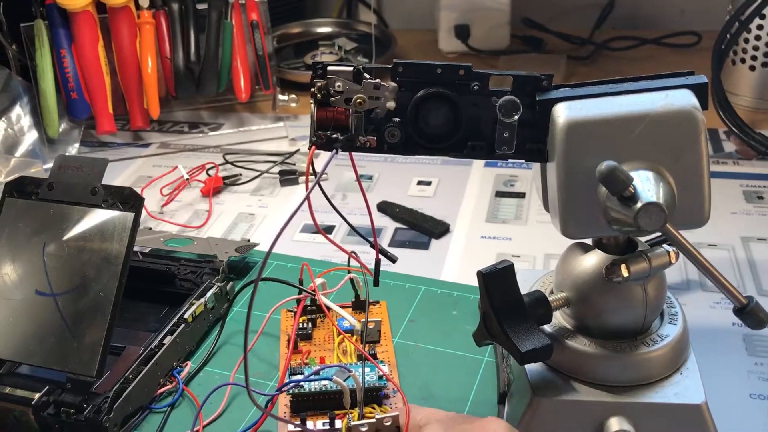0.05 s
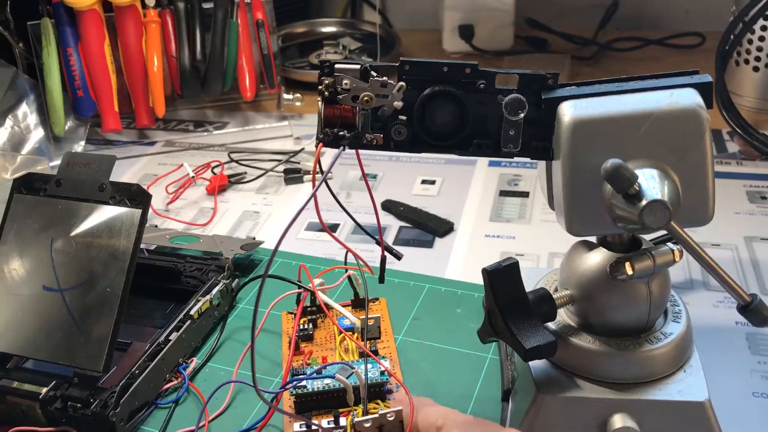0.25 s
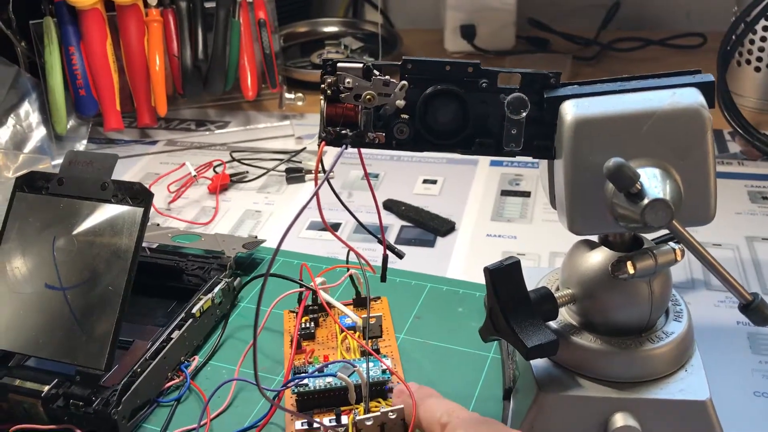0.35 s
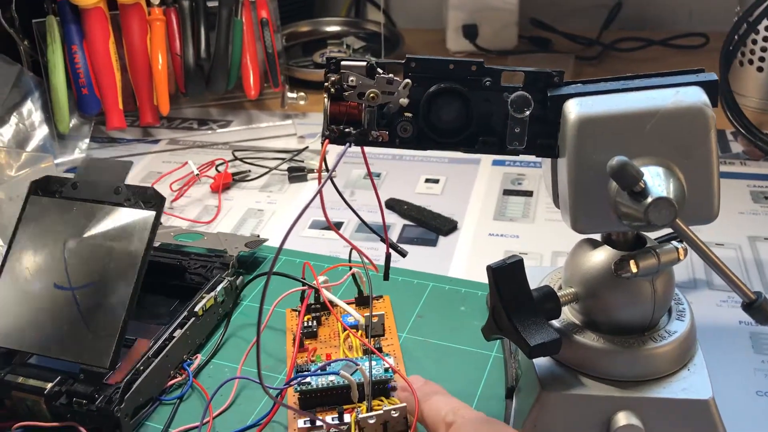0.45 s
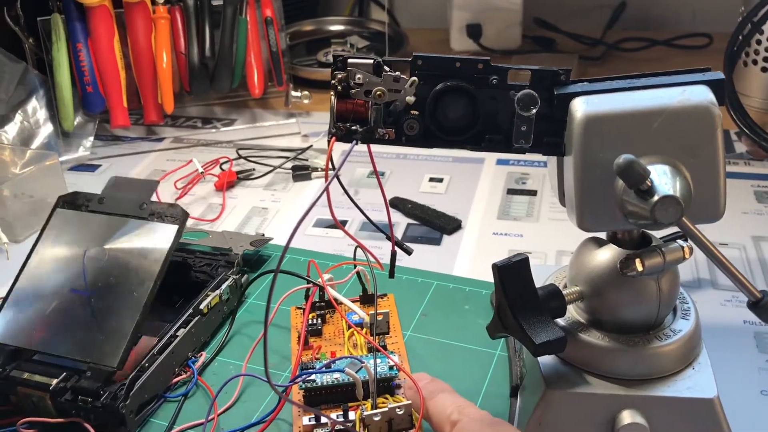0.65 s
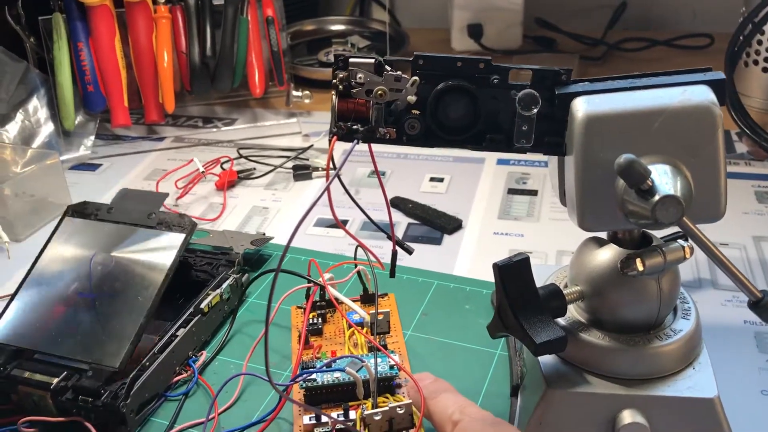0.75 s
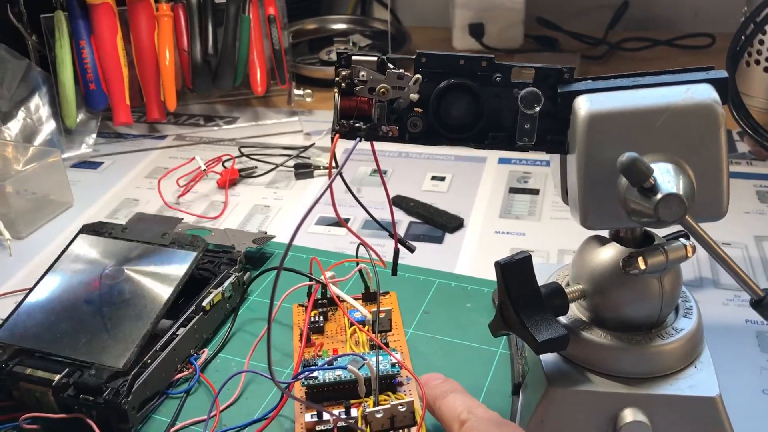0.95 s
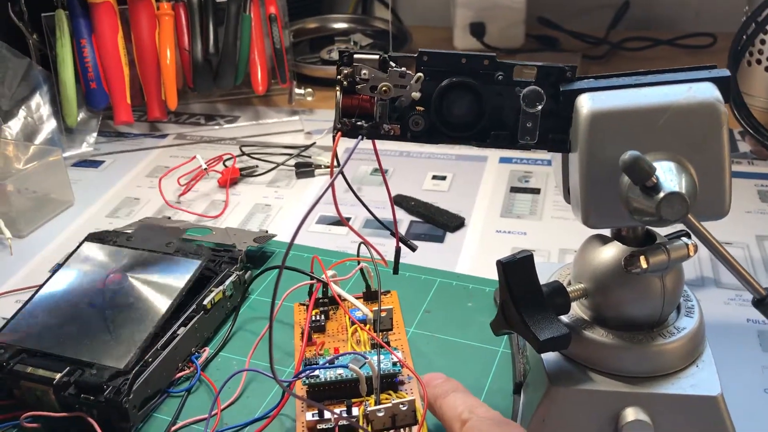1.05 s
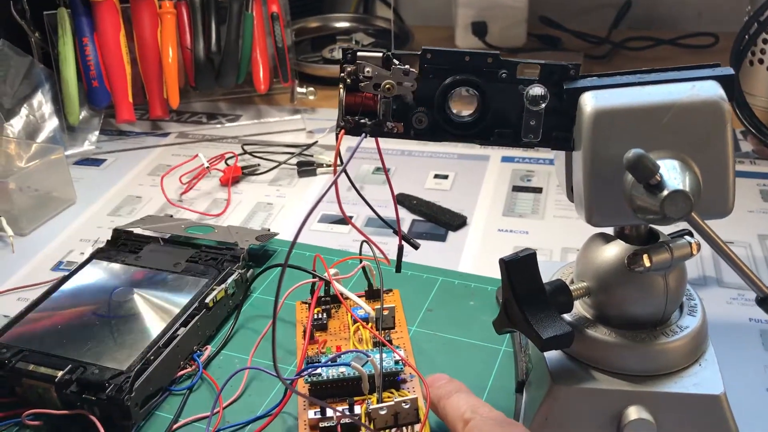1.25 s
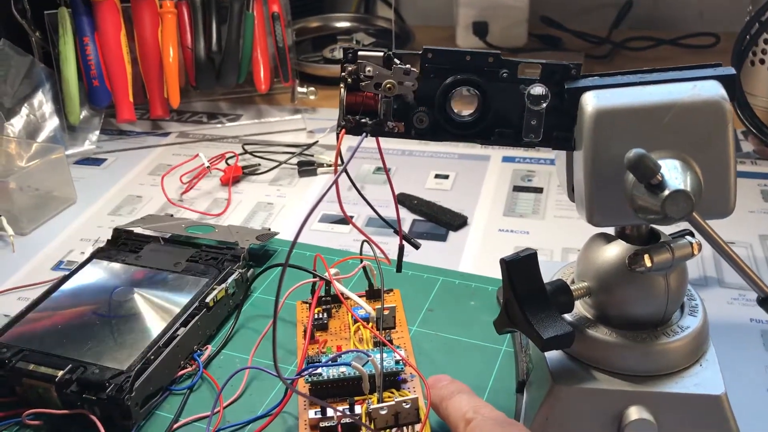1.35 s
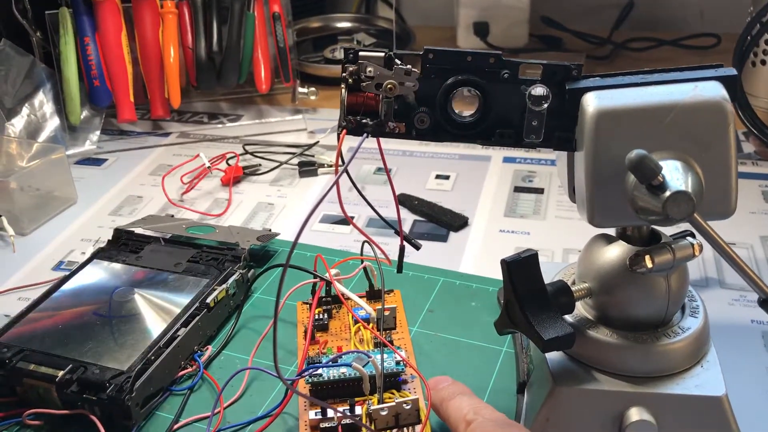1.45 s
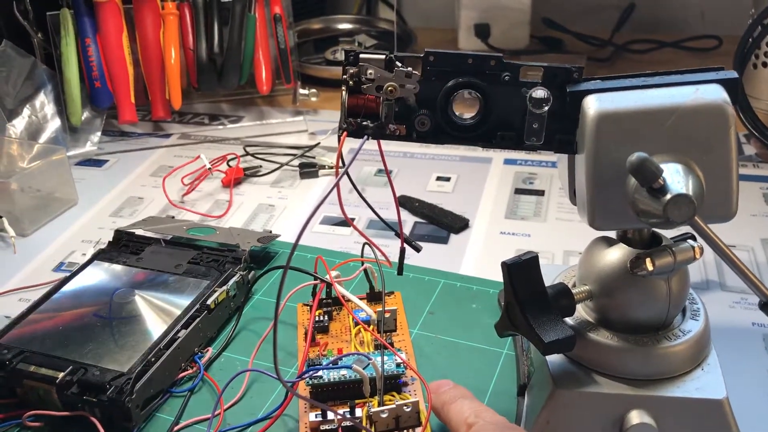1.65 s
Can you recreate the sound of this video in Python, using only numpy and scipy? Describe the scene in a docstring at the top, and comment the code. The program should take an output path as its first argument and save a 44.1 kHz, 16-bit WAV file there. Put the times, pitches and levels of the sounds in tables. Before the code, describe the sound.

Small motor whirring inside an opened camera, with light clicks first and four sharp snaps.

```python
"""A small motor drives the gear train of an opened camera, close up on a workbench.
Button and latch click; the motor spins up with a soft thump of its mount. Tooth impacts ring the
chassis over the shaft whine. A cam lets a sprung lever snap four times. The gears rattle and coast
to rest; a slack one knocks once. Small room with rumble, low hum and faint hiss."""
import sys
import numpy as np
from scipy import signal
from scipy.fft import rfft, irfft, next_fast_len
from scipy.io import wavfile
from scipy.ndimage import uniform_filter1d, map_coordinates

SR = 44100
rng = np.random.default_rng(int(sys.argv[2]) if len(sys.argv) > 2 else 0)


def bounce(signal):
    """Save signal as a 16-bit WAV file at the path given by the first command-line argument."""
    frames = np.transpose(np.atleast_2d(signal))
    limited = np.clip(frames, -1, 1)
    pcm = np.round(limited * 32767).astype(np.int16)
    wavfile.write(sys.argv[1], SR, pcm)


N = 74970

# room rumble spectrum [f/Hz, level/dB]
RUMBLE_EQ = [(20, -39), (40, -7.5), (60, 5), (80, -3), (105, 2), (150, -15), (195, -5.5), (270, -13.5),
             (335, -13.5), (450, -22), (900, -19.5), (2000, -28), (3500, -36)]
# rumble envelope [t/s, level/dB]
RUMBLE_LEVEL = [(0, -51.5), (.6, -51.5), (1.1, -52.5), (1.7, -50.5)]
# hum envelope [t/s, level/dB]
HUM_LEVEL = [(0, -55.5), (.5, -58.5), (1, -62.5), (1.7, -61)]
# hiss spectrum [f/Hz, level/dB]
HISS_EQ = [(500, -6), (3000, 2), (7000, 0), (10300, -6), (13000, -3.5), (16000, -6)]
# hiss envelope [t/s, level/dB]
HISS_LEVEL = [(0, -82.5), (.13, -65.5), (.3, -58), (1.5, -62), (1.7, -66.5)]
# dull button knocks on the bench [t/s, level/dB, decay/s]
KNOCKS = [(0.0926, -39, 0.0025), (.1, -40.5, 0.0068), (0.2684, -38.5, .013), (.3075, -41.5, 0.011),
          (0.327, -46.5, 0.029)]
# knock spectrum [f/Hz, level/dB]
KNOCK_EQ = [(150, -27), (330, 4.5), (450, -3), (550, 1), (800, -5), (1150, -4), (1500, -17), (4000, -41),
            (12000, -39.5)]
# button contact tick [t/s, level/dB, decay/s]
TICK = [(.0925, -33.5, 0.00084)]
# tick spectrum [f/Hz, level/dB]
TICK_EQ = [(400, -3), (1300, 3.5), (2200, 3), (3800, -19), (7000, -6.5), (11000, 1), (15500, 0)]
# latch clicks [t/s, level/dB, decay/s]
CLICKS = [(.1425, -31.5, 0.0017), (.2008, -25, 0.0024), (0.2074, -32, 0.005), (.212, -17, 0.0026),
          (.3075, -44, 0.0035)]
# click spectrum [f/Hz, level/dB]
CLICK_EQ = [(300, -18), (900, -6.5), (1400, -6.5), (2600, -1.5), (5200, 0.5), (7000, 1.5), (10000, 3.5),
            (13000, 0), (15500, 2.5)]
# metal ring of the latch [f/Hz, level/dB re click, t60/s]
LATCH_MODES = [(2170, -22, 0.071), (5470, -22, 0.067), (8000, -37, 0.26), (10820, -36, .18),
               (11840, -35.5, .17)]
# ping of a small spring [f/Hz, level/dB, t60/s]
SPRING_MODES = [(2980, -42.5, 0.042), (3150, -47, 0.046)]
# shaft speed [t/s, speed/(rev/s)]
SHAFT_SPEED = [(.31, 90), (.35, 180), (.39, 208), (.5, 215), (.68, 211), (.76, 214), (.98, 211),
               (1.13, 215), (1.3, 210), (1.37, 135), (1.47, 50)]
# envelope of chatter and whine [t/s, level/dB]
DRIVE_LEVEL = [(.29, -100), (.307, -60), (.335, -39.5), (.38, -34.5), (.45, -33.5), (.5, -32), (.55, -33.5),
               (.6, -31.5), (.68, -31.5), (.73, -33), (.83, -33.5), (.95, -31.5), (1.05, -32.5),
               (1.13, -32.5), (1.29, -32), (1.34, -33), (1.39, -38), (1.44, -47), (1.55, -76)]
# gear chatter spectrum [f/Hz, level/dB]
CHATTER_EQ = [(200, -21.5), (500, -26.5), (900, -13.5), (1400, -9), (2000, -8), (3000, -2), (4200, -1.5),
              (5200, -4), (6500, -2.5), (8400, -2.5), (10000, -2), (13000, -5), (15500, -6)]
# chassis resonances and dips [f/Hz, width/Hz, gain/dB]
CHASSIS_PEAKS = [(720, 27, 4.5), (1291, 114, 5.5), (1480, 190, 6), (1690, 190, 2.5), (1960, 160, -4),
                 (2233, 66, 4), (2360, 87, -6.5), (3227, 130, 3.5), (3305, 86, -11.5), (3670, 100, 0.5),
                 (4160, 100, 3.5), (4444, 99, 4), (6260, 200, 5), (6740, 100, 3.5), (7660, 80, 3),
                 (8230, 150, 7), (8900, 51, 2), (10440, 330, -4), (11400, 210, 0), (14600, 340, 1.5)]
# motor whine [shaft order, level/dB re chatter]
WHINE_ORDERS = [(3, -35), (4, -34.5), (5, -41), (6, -25), (7, -19), (8, -29.5)]
# low gear rattle envelope, strongest while coasting [t/s, level/dB]
RATTLE_LEVEL = [(.29, -95), (.32, -54), (.35, -62), (.41, -52), (.48, -63.5), (1.28, -65), (1.33, -47.5),
                (1.39, -45.5), (1.43, -50), (1.55, -102)]
# rattle spectrum [f/Hz, level/dB]
RATTLE_EQ = [(300, -18.5), (700, -2), (1000, 7), (1700, 5.5), (3000, -14), (8000, -95)]
# motor mount modes [f/Hz, level/dB, t60/s]
MOUNT_MODES = [(104, -27, 0.15), (210, -37.5, 0.17), (315, -25, 0.059)]
# lever snaps [t/s, level/dB, decay/s]
SNAPS = [(0.3893, -8, 0.0011), (0.6989, -9.5, 0.0016), (1.0013, -10.5, 0.0027), (1.3048, -11, 0.0024)]
# snap spectrum [f/Hz, level/dB]
SNAP_EQ = [(300, -29), (850, -32), (1250, -8), (2100, -4.5), (3300, 4), (6000, -2.5), (9500, 2), (11200, 4),
           (12200, 3), (15500, 3.5)]
# chassis ring under each snap [f/Hz, level/dB re snap, t60/s]
SNAP_MODES = [(1277, -30, 0.074), (1464, -31, 0.055), (1640, -28.5, 0.045), (11030, -1.5, 0.0097)]
# slack gear knock [t/s, level/dB, decay/s]
SLACK_KNOCK = [(1.39, -35, 0.0036)]
# slack knock spectrum [f/Hz, level/dB]
SLACK_EQ = [(500, -24), (1100, -9), (1700, 4), (2500, -1), (4000, -10), (12000, -25)]


def undb(db):
    """Decibels to gain."""
    return 10 ** (np.asarray(db) / 20)


def curve(rows):
    """Linear interpolation of (t/s, value) rows."""
    return np.interp(np.arange(N) / SR, *np.array(rows, float).T)


def unit(x):
    """Scale to rms 1."""
    return x / np.sqrt(np.mean(x ** 2))


def drift(rate_hz):
    """Smooth random drift, rms 1."""
    hold = int(SR / rate_hz)
    steps = np.repeat(rng.standard_normal(N // hold + 1), hold)
    return unit(uniform_filter1d(steps, hold)[:N])


def colour(x, eq, peaks=()):
    """Minimum-phase filter, unit power gain, from (f/Hz, level/dB) rows and resonances."""
    size = 2 * next_fast_len(N)
    f_hz = np.arange(size // 2 + 1) * SR / size
    eq_hz, eq_db = np.array(eq, float).T
    db = np.interp(np.log(f_hz + 1), np.log(eq_hz), eq_db)
    for centre_hz, width_hz, gain_db in peaks:
        db += gain_db / (1 + (2 * (f_hz - centre_hz) / width_hz) ** 2)
    cepstrum = irfft(np.log(unit(undb(db))))
    cepstrum[1:size // 2] *= 2
    cepstrum[size // 2 + 1:] = 0
    return irfft(rfft(x, size) * np.exp(rfft(cepstrum)))[:N]


def since(start_s):
    """Seconds since start_s, zero before."""
    return np.maximum(np.arange(N) / SR - start_s, 0)


def blows(rows, attack_s, tail_db, tail_s):
    """Per row: a tight burst of contacts plus a weaker, longer rattle."""
    envelope = 0
    for start_s, db, decay_s in rows:
        age_s = since(start_s)
        fall = np.hypot(np.exp(-age_s / decay_s), undb(tail_db) * np.exp(-age_s / tail_s))
        envelope += undb(db) * np.minimum(age_s / attack_s, 1) * fall
    return envelope * rng.choice([-1., 1.], N)


def ring(modes, start_s, attack_s):
    """Decaying modes of a struck part."""
    age_s = since(start_s)
    tone = sum(undb(db) * np.sin(2 * np.pi * hz * age_s) * 1000 ** (-age_s / t60_s)
               for hz, db, t60_s in modes)
    return np.minimum(age_s / attack_s, 1) * tone


def background(rumble_top_hz=4000, hum_hz=256, waver_db=2):
    """Low room rumble, wavering hum, faint hiss."""
    rumble = undb(curve(RUMBLE_LEVEL)) * colour(rng.standard_normal(N), RUMBLE_EQ)
    rumble = signal.sosfilt(signal.butter(2, rumble_top_hz, fs=SR, output="sos"), rumble)
    hum_db = curve(HUM_LEVEL) + waver_db * drift(7.76)
    hum = undb(hum_db) * np.sqrt(2) * np.sin(2 * np.pi * hum_hz * since(0))
    hiss = undb(curve(HISS_LEVEL)) * colour(rng.standard_normal(N), HISS_EQ)
    return rumble + hum + hiss


def button(contact_db=13.5):
    """Dull knocks on the bench, each with a hard first contact; one thin contact tick."""
    knocks = blows(KNOCKS, attack_s=.00067, tail_db=-23, tail_s=.019)
    for start_s, db, _ in KNOCKS:
        knocks[int(start_s * SR)] += undb(db + contact_db)
    tick = blows(TICK, attack_s=.0002, tail_db=-19, tail_s=.0038)
    return colour(knocks, KNOCK_EQ) + colour(tick, TICK_EQ)


def latch():
    """Clicks ring the thin metal; a small spring pings with the first."""
    clicks = blows(CLICKS, attack_s=.00021, tail_db=-11, tail_s=.0081)
    metal = sum(undb(db) * ring(LATCH_MODES, start_s, attack_s=.001) for start_s, db, _ in CLICKS)
    spring = ring(SPRING_MODES, start_s=.1425, attack_s=.001)
    return colour(clicks, CLICK_EQ, peaks=[(5100, 180, 6)]) + metal + spring


def flicker(x, depth_db, rate_hz):
    """Each of 14 bands wavers in level on its own."""
    f_hz = np.arange(N // 2 + 1) * SR / N
    lowpassed = [irfft(rfft(x) * (f_hz < edge_hz), N) for edge_hz in np.geomspace(1000, 16000, 13)]
    bands = np.diff([np.zeros(N), *lowpassed, x], axis=0)
    return sum(band * undb(depth_db * drift(rate_hz)) for band in bands)


def gears(speed_rps, turns, peak_hits_per_s=9000, scatter_db=3, repeat_db=-4.5):
    """Tooth impacts, partly repeating each turn, ring the chassis; the random ones also rattle low."""
    hits = rng.random(N) < peak_hits_per_s / SR * speed_rps / speed_rps.max()
    loose = unit(hits * rng.choice([-1., 1.], N) * undb(scatter_db * rng.standard_normal(N)))
    one_turn = rng.standard_normal(200)
    repeating = unit(map_coordinates(one_turn, [turns % 1 * len(one_turn)], mode="grid-wrap"))
    teeth = flicker(loose + undb(repeat_db) * repeating, depth_db=1.48, rate_hz=34.93)
    chatter = unit(colour(teeth, CHATTER_EQ, CHASSIS_PEAKS)) * undb(.87 * drift(150))
    rattle = colour(loose, RATTLE_EQ)
    return undb(curve(DRIVE_LEVEL)) * chatter + undb(curve(RATTLE_LEVEL)) * rattle


def whine(turns, roughness=.45):
    """Harmonics of the shaft rate, each wavering in level."""
    partials = sum(undb(db) * np.sin(2 * np.pi * order * turns) * (1 + roughness * drift(24.97))
                   for order, db in WHINE_ORDERS)
    return undb(curve(DRIVE_LEVEL)) * np.sqrt(2) * partials


def motor(jitter=.003):
    """One shaft, slightly unsteady, drives gears and whine."""
    speed_rps = curve(SHAFT_SPEED) * (1 + jitter * drift(40))
    turns = np.cumsum(speed_rps) / SR
    return gears(speed_rps, turns) + whine(turns)


def mount_thump():
    """The starting motor rings its mount."""
    return ring(MOUNT_MODES, start_s=.319, attack_s=.018)


def lever():
    """The lever drops off the cam, strikes the chassis and rings it."""
    snaps = blows(SNAPS, attack_s=.00084, tail_db=-5, tail_s=.0055)
    chassis = sum(undb(db) * ring(SNAP_MODES, start_s, attack_s=.0005) for start_s, db, _ in SNAPS)
    return colour(snaps, SNAP_EQ, CHASSIS_PEAKS) + chassis


def slack_gear():
    """A slack gear knocks once as the train slows."""
    return colour(blows(SLACK_KNOCK, attack_s=.00056, tail_db=-15, tail_s=.005), SLACK_EQ)


def room(x, delay_s=.0085, t60_s=.4, echo_db=-15.5):
    """Direct sound plus the diffuse echo of a small workshop."""
    age_s = since(delay_s)
    tail = rng.standard_normal(N) * (age_s > 0) * 1000 ** (-age_s / t60_s)
    return x + undb(echo_db) * signal.fftconvolve(x, tail / np.linalg.norm(tail))[:N]


def scene():
    """The mechanism in its room, both channels alike."""
    mechanism = motor() + mount_thump() + lever() + latch() + button() + slack_gear()
    mono = room(mechanism) + background()
    return np.array([mono, mono])


def record(dry, top_hz=15900):
    """Steep elliptic low-pass."""
    return signal.sosfilt(signal.ellip(10, .2, 70, top_hz, fs=SR, output="sos"), dry)


dry = scene()
out = record(dry)
bounce(out)
```